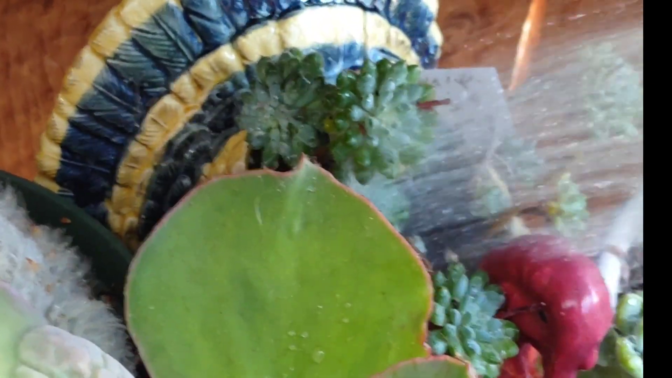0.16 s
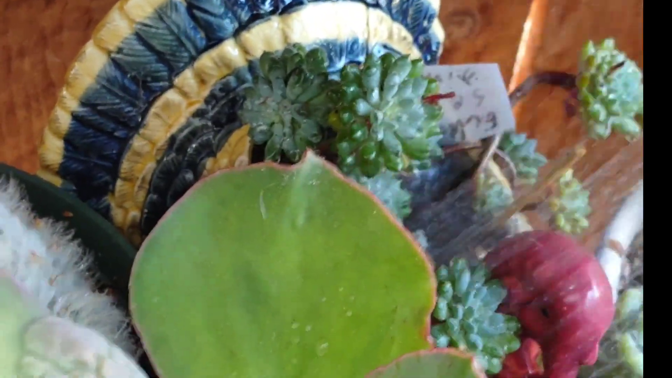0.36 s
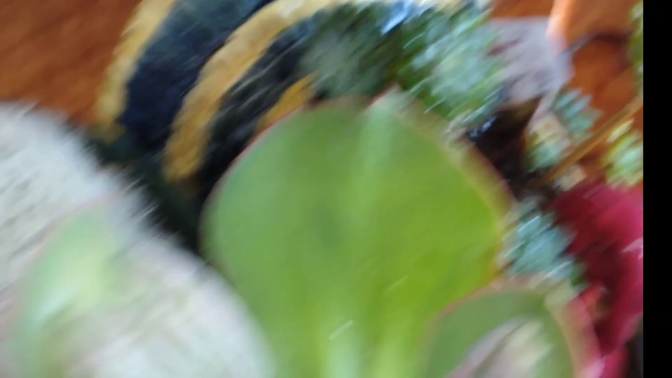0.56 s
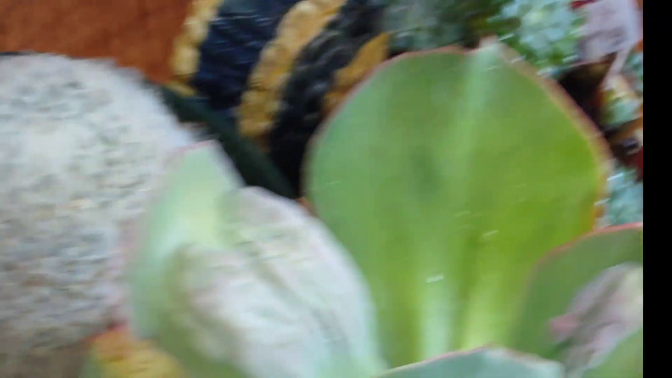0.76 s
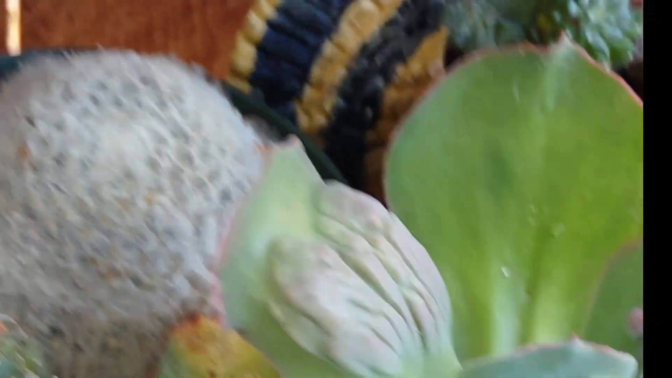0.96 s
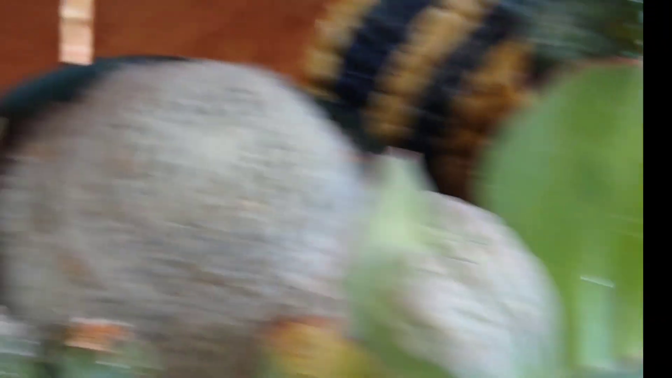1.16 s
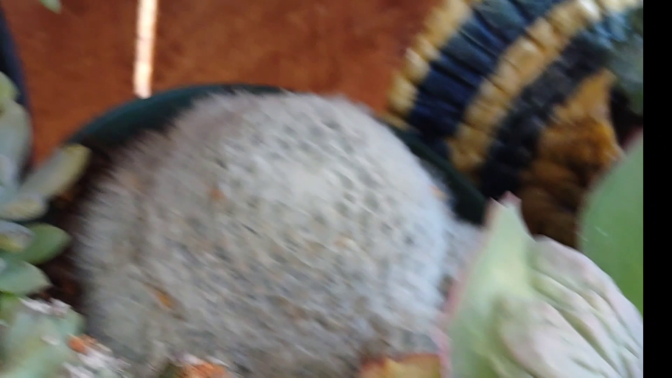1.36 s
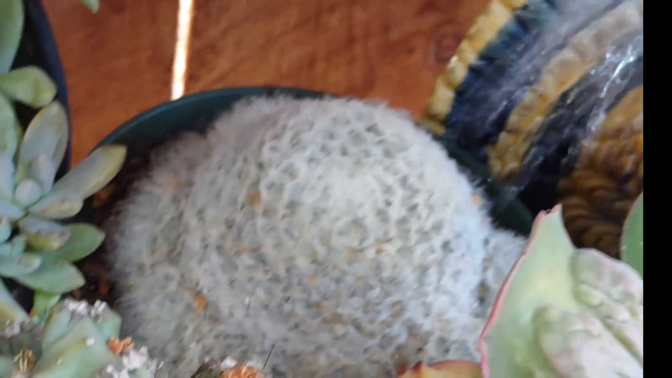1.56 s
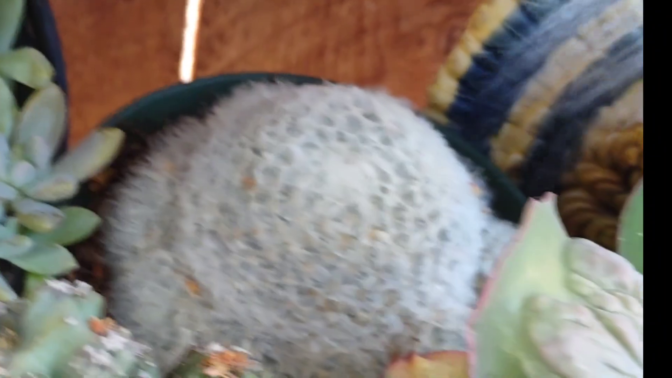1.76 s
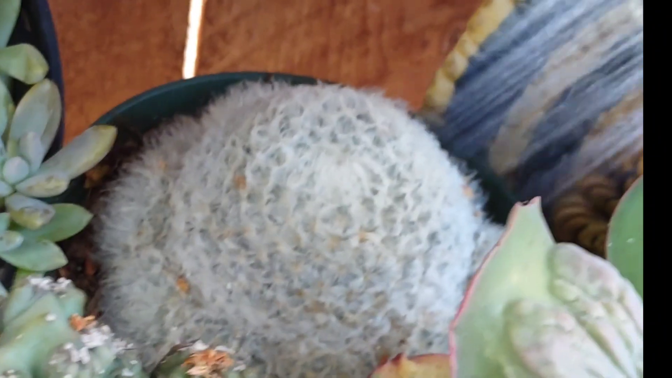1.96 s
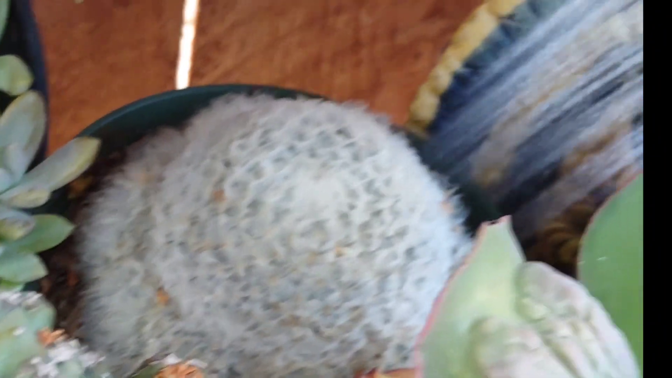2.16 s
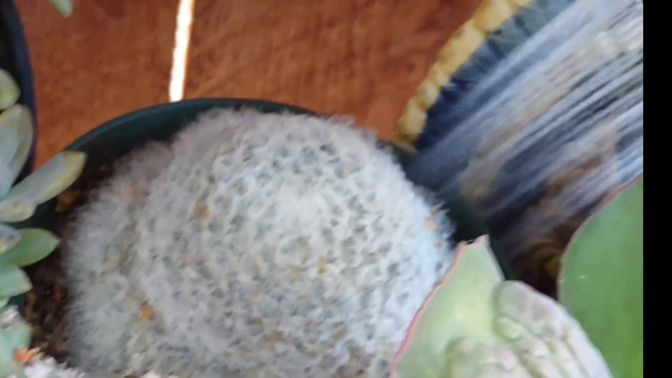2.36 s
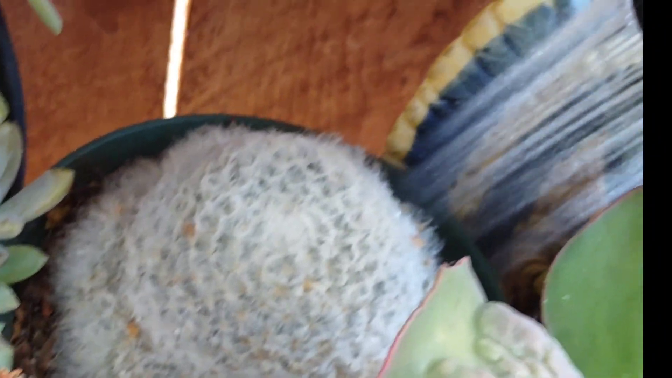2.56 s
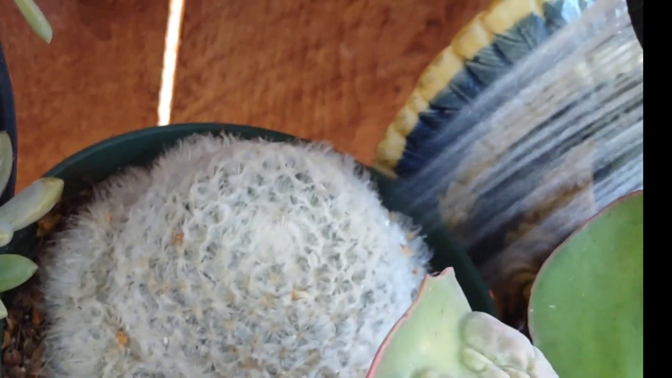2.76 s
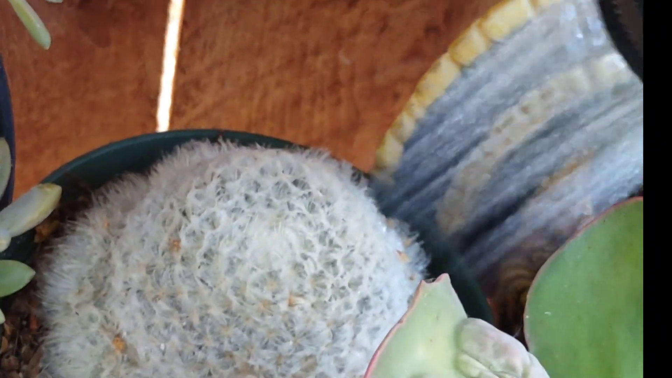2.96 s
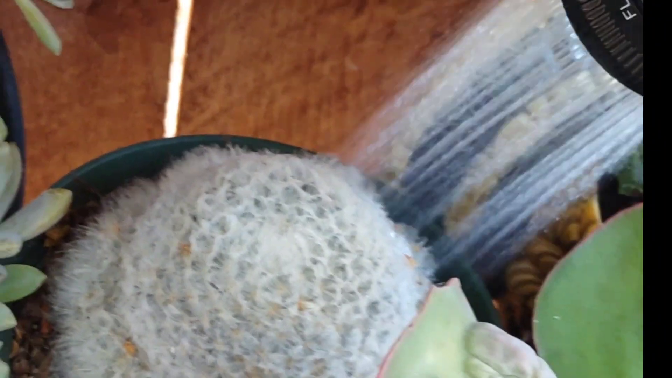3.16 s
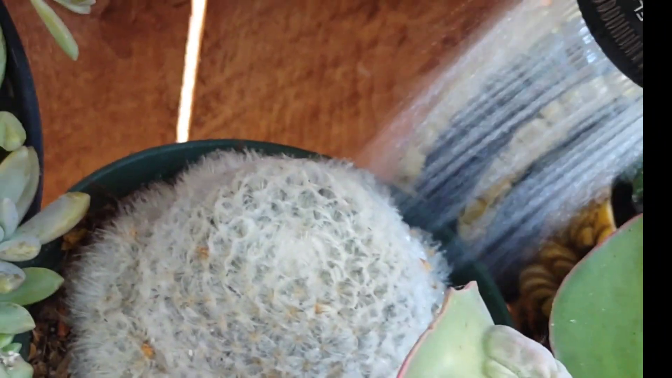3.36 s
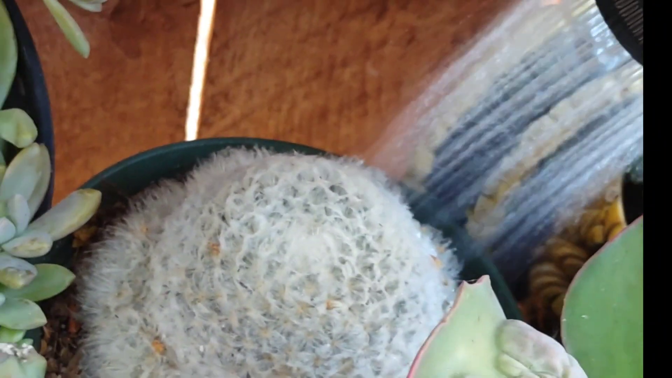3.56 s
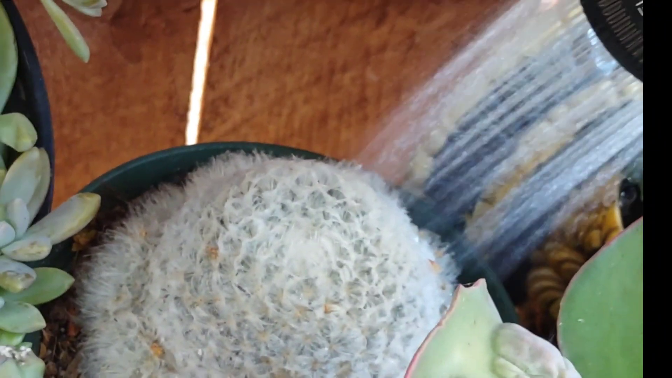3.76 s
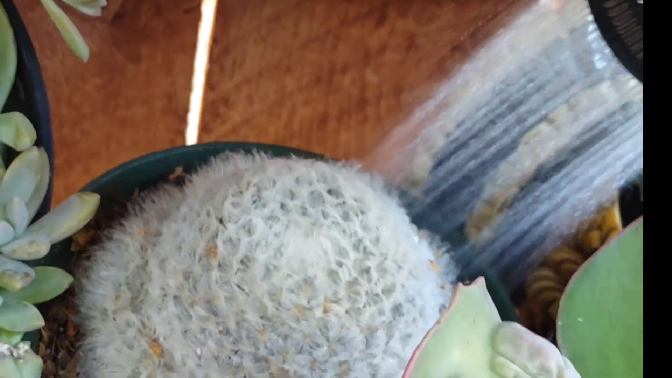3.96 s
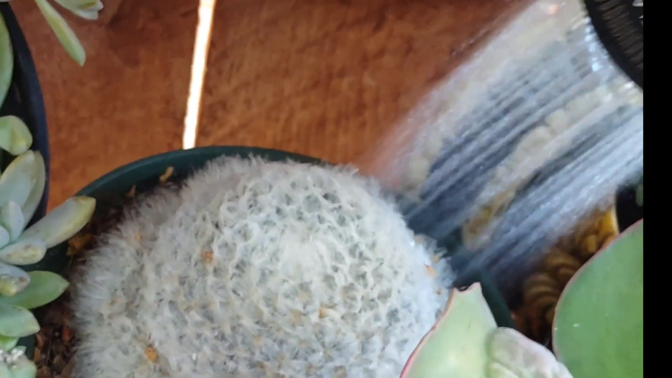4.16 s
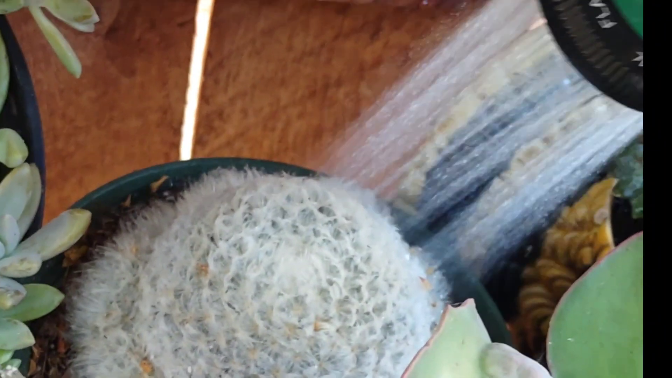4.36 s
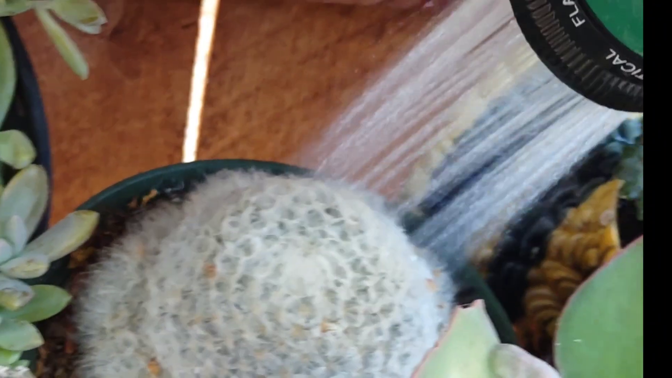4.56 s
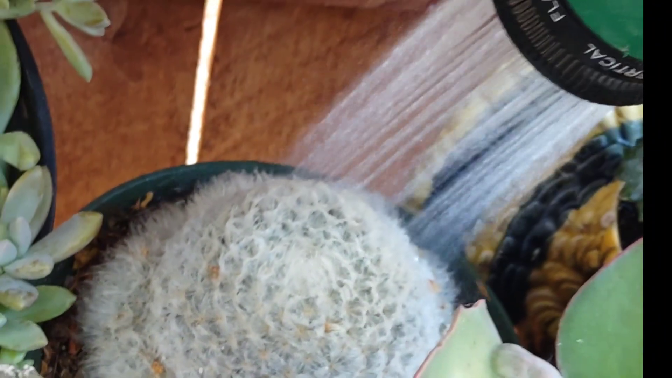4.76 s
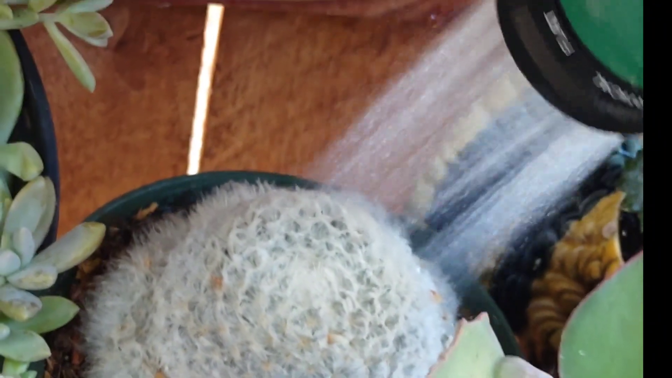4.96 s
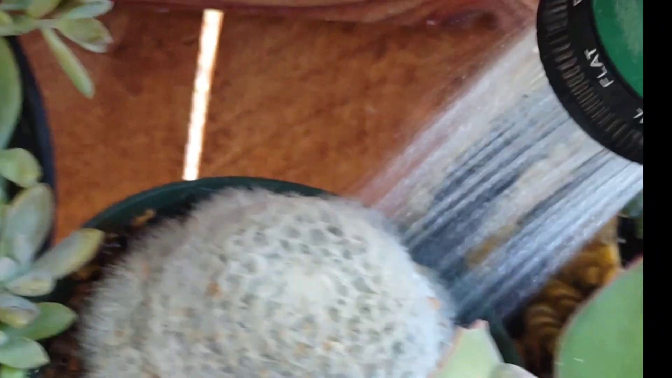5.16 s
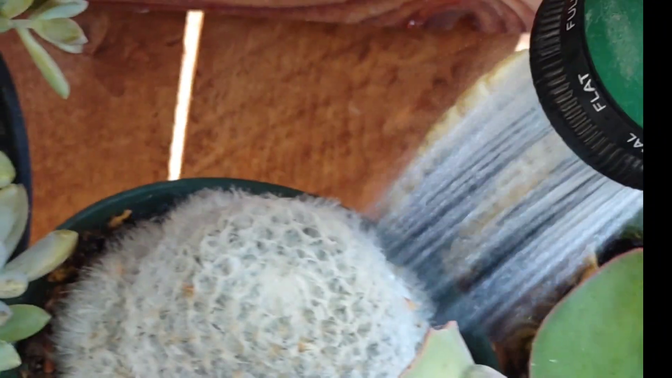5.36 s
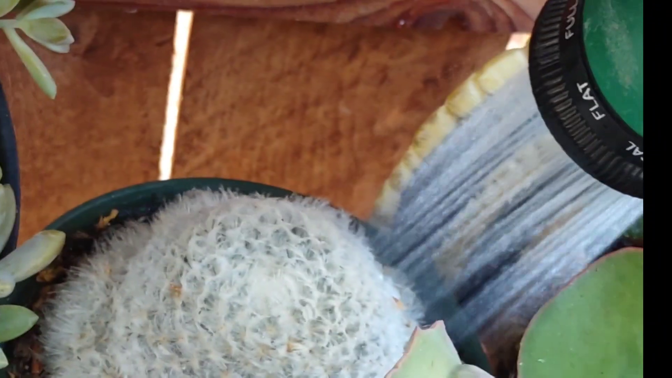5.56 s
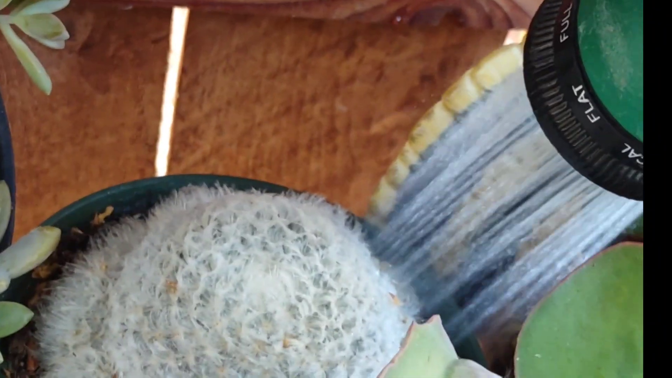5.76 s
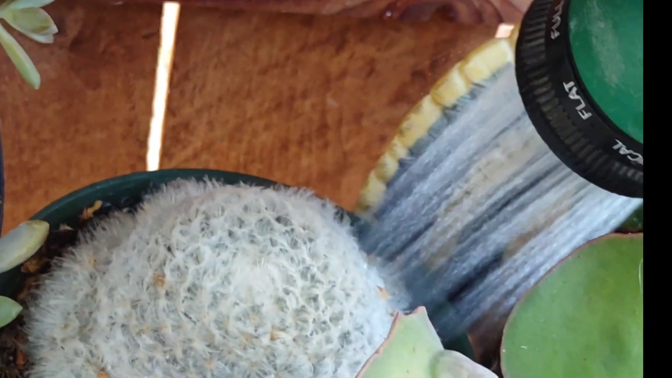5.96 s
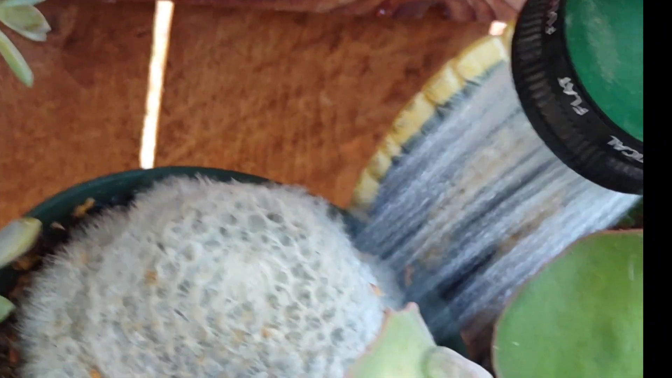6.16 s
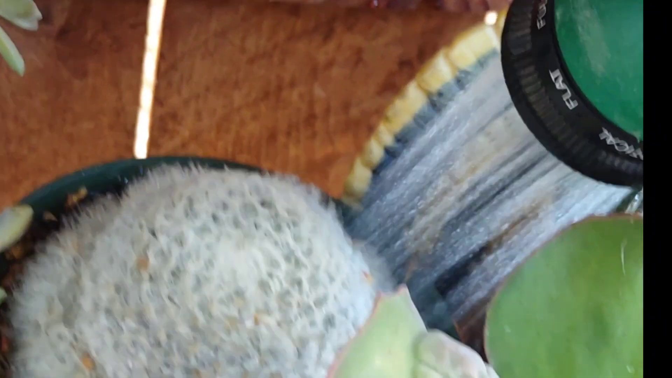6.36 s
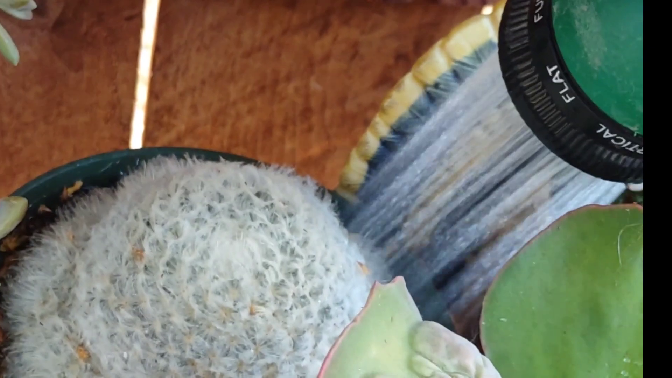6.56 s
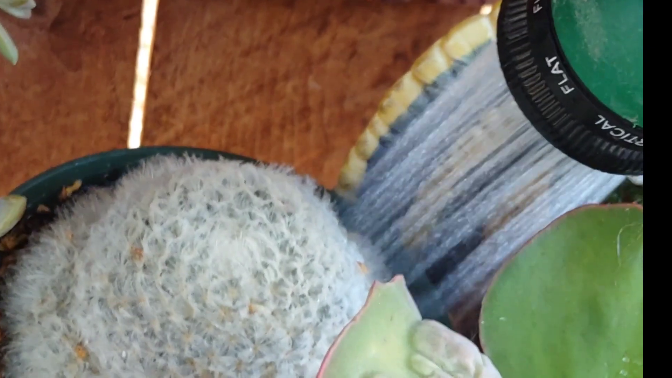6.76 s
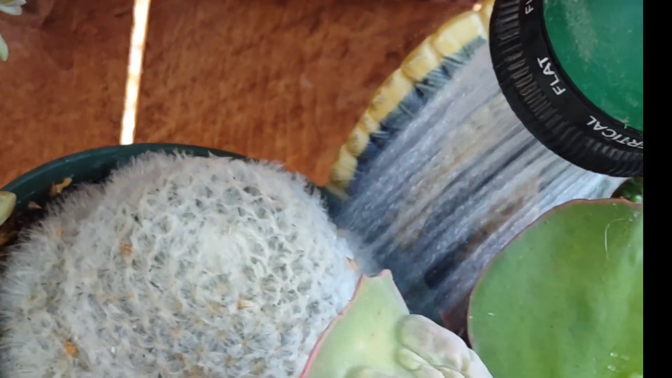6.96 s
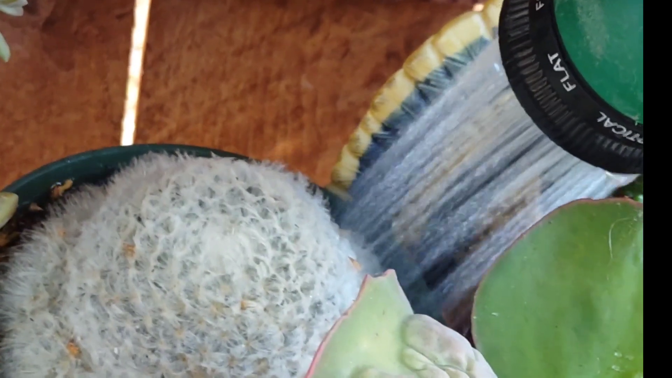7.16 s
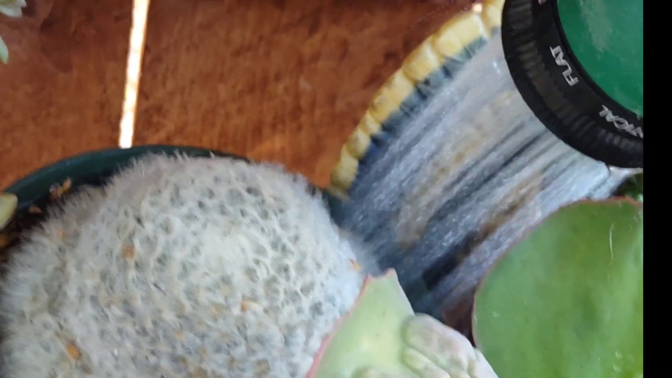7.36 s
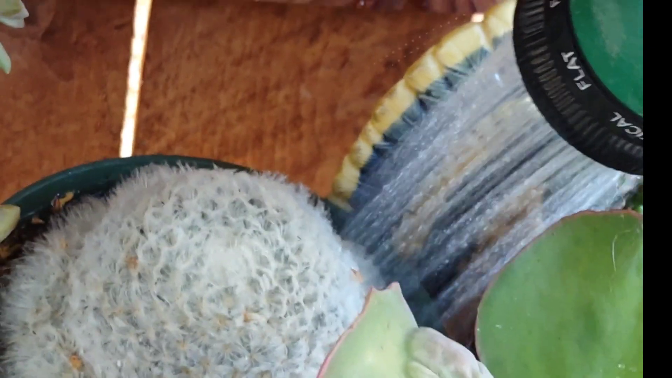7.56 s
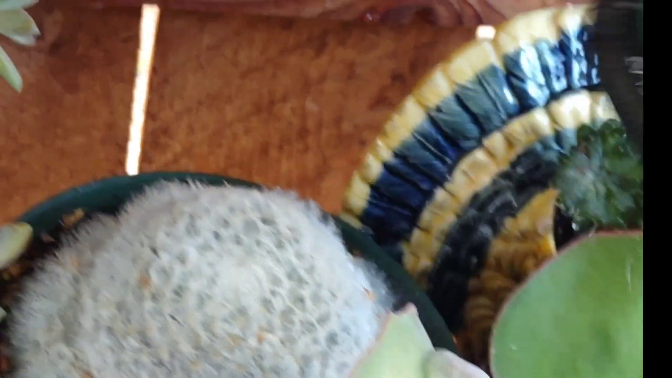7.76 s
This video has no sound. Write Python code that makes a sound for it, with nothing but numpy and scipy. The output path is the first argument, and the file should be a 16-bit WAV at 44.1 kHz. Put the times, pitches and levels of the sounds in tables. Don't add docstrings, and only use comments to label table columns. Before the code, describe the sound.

Close outdoors, a hose spray hisses brightly on a plant pot for a moment, then cuts off. Over a second of scattered drops follows: wet splats, fine ticks, high ringing plinks and small pot knocks. The jet returns, hissing densely for about six seconds with gently sliding colour, then stops into a few drips. Faint low outdoor hum beneath; close, wide stereo phone pickup.

```python
import sys
import numpy as np
from scipy import signal
from scipy.fft import rfft, irfft
from scipy.io import wavfile
from scipy.ndimage import uniform_filter1d

SR = 44100
rng = np.random.default_rng(int(sys.argv[2]) if len(sys.argv) > 2 else 0)


def boost_factor(decibels):
    exponent = np.asarray(decibels, float) / 20
    return 10 ** exponent


def bounce(signal):
    frames = np.transpose(np.atleast_2d(signal))
    limited = np.clip(frames, -1, 1)
    pcm = np.round(limited * 32767).astype(np.int16)
    wavfile.write(sys.argv[1], SR, pcm)


N = 343980
T = np.arange(N) / SR
HZ = np.fft.rfftfreq(2048, 1 / SR)

# (start [s], end [s])
SHUT = [
    (0.3, 1.5),
    (7.68, 7.85),
]


def shape(points, hz):
    f, db = np.transpose(points)
    return np.interp(np.log(hz + 1), np.log(f + 1), db)


def colour(x, db):
    cepstrum = irfft(db * np.log(10) / 20)
    cepstrum[:, 1:1024] *= 2
    cepstrum[:, 1024:] = 0
    return signal.oaconvolve(x, irfft(np.exp(rfft(cepstrum))), axes=1)


def walk(rate):
    hold = int(SR / rate)
    steps = np.repeat(rng.standard_normal(N // hold + 1), hold)
    return uniform_filter1d(uniform_filter1d(steps, hold), hold)[:N]


def curve(tables, column, outside):
    total = outside
    for table in tables:
        times, values = np.array(table).T[[0, column]]
        total = total + np.interp(T, times, values, left=outside, right=outside) - outside
    return total


def patter(rate, spread_db, t60):
    size_db = spread_db * np.minimum(rng.exponential(size=N), 4)
    lands = (rng.random(N) < rate / SR) * boost_factor(2 * size_db)
    decay = 1e-6 ** (1 / (t60 * SR))
    power = signal.lfilter([1], [1, -decay], lands) + 1e-12
    return np.sqrt(power / power.mean())


def leaning(db):
    return boost_factor(np.array([db / 2, -db / 2]))


def hum():
    # (frequency [Hz], level [dB per Hz])
    rumble = [(12, -52), (45, -2.5), (204, -2), (288, -4), (382, -1.5), (517, -6.5), (659, -6),
              (1050, -12.5), (1160, -10.5), (1810, -16), (2500, -8), (3250, -40), (5500, -120)]
    # (frequency [Hz], side minus mid [dB])
    rumble_side = [(30, -27), (60, -19), (125, -14), (250, -13), (500, -4), (1200, -2)]
    rumble_db, tone_hz, tone_db = -63, 209, -76

    hz = np.fft.rfftfreq(N, 1 / SR)
    mid, side = rfft(rng.standard_normal((2, N))) * boost_factor(shape(rumble, hz))
    mid, side = irfft([mid, side * boost_factor(shape(rumble_side, hz))], N)
    swell_db = .7 * walk(3)
    gain = boost_factor(rumble_db + swell_db) / np.std(mid)
    phase = 2 * np.pi * tone_hz * np.cumsum(1 + 0.015 * walk(6.5)) / SR
    tone = boost_factor(tone_db + 3.5 * walk(3.7)) * np.sin(phase)
    return gain * np.array([mid + side, mid - side]) + tone


def knocks():
    # (time [s], peak [dB], low edge [Hz], high edge [Hz], t60 [s])
    raps = [(.69, -50, 980, 1400, 0.067), (.77, -52, 1540, 2000, 0.064), (0.974, -37.5, 2670, 3170, 0.02),
            (1.2955, -20.5, 900, 11000, 0.00092), (1.438, -55, 400, 1500, .008),
            (2.22, -47.5, 603, 1100, 0.24), (3.93, -35.5, 624, 1450, 0.09), (4.011, -36, 250, 3500, 0.0052),
            (4.455, -40, 600, 1400, 0.09), (4.84, -46.5, 150, 700, 0.11), (4.875, -47, 420, 676, 0.13),
            (5.51, -51, 149, 450, 0.034), (6.911, -53, 200, 696, 0.069), (4.457, -24.5, 1100, 2900, 0.029),
            (0.183, -16.5, 7700, 10500, 0.023), (1.418, -44, 1700, 2000, 0.045)]
    dry_below_s, near_pan_db, pot_pan_db = .02, 34.5, 9

    out = np.zeros((2, N))
    t = T[:8192]
    for s, db, low_hz, high_hz, t60 in raps:
        i = int(s * SR)
        is_dry = t60 < dry_below_s
        blow = rng.standard_normal(len(t)) * 1e-3 ** (t / t60)
        if is_dry:
            blow[0] = 4
        band = signal.butter(2 if is_dry else 3, (low_hz, high_hz), "band", fs=SR, output="sos")
        rap = signal.sosfilt(band, blow)
        gains = boost_factor(db) * leaning(near_pan_db if is_dry else pot_pan_db)
        out[:, i:i + len(t)] += np.outer(gains, rap / abs(rap).max())
    return out


def plinks():
    # (time [s], peak [dB], pitch [Hz], left minus
    # right [dB])
    ringing_drops = [(0.36, -29, 4140, -2.5), (0.3743, -26, 5120, -2.5), (0.4261, -26, 5150, -1.5),
                     (0.462, -38, 5090, -3), (0.484, -28, 4200, 5), (0.5179, -28, 5280, 0.5),
                     (0.535, -32, 5420, -1.5), (0.57, -23, 5660, 4), (0.5946, -31, 5690, -0.5),
                     (0.6248, -17, 5970, 8), (0.6656, -21.5, 5040, 0.0), (0.7, -32, 2920, 9),
                     (0.743, -33, 6660, -1.5), (0.7695, -25, 5770, -3), (0.8146, -23, 4140, 6),
                     (0.848, -38, 5450, -0.5), (0.8557, -25, 5170, 0.0), (0.936, -28, 5440, -2.5),
                     (0.9614, -31, 5580, 0.5), (0.975, -37, 3130, 6), (1.0108, -34, 5310, -3.5),
                     (1.0757, -34, 7040, -2.0), (1.086, -19, 7290, 0.5), (1.167, -45, 5420, -7.5),
                     (1.1834, -44, 5430, 2.0), (1.21, -29, 4480, 1), (1.2104, -27, 5450, -1.0),
                     (1.235, -28, 5090, 2), (1.272, -30, 5370, 0.5), (1.292, -30, 7220, 4),
                     (1.3435, -35, 7150, 1.5), (1.355, -31, 7110, -2.0), (1.371, -18, 5400, 1),
                     (1.4079, -39, 4200, 7.0), (1.408, -24, 3270, 8), (1.436, -13, 6450, -1),
                     (1.4698, -27, 3470, 2.5), (1.4837, -24, 3500, 4), (0.462, -29.5, 3000, 7),
                     (0.6045, -23, 5200, 0), (0.625, -27, 3200, -1), (0.677, -27, 4500, 2),
                     (0.986, -28, 5500, 0), (1.099, -34, 3100, 8), (1.112, -28.5, 5500, 0),
                     (1.348, -31, 3090, 5), (1.272, -38, 3220, 2),
                     (7.7313, -34, 5280, -2), (7.7733, -27, 4440, 1.5), (7.7924, -26, 4800, 1.5),
                  (7.7313, -30, 3500, -1), (7.692, -24, 4900, 0)]
    trim_db, t60_s, relative_width = -6.5, 0.062, 0.11

    t = T[:4096]
    out = np.zeros((2, N + 4096))
    for s, db, hz, pan_db in ringing_drops:
        i = int(s * SR)
        blow = rng.standard_normal((2, len(t))) * 1e-3 ** (t / t60_s)
        resonance = signal.iirpeak(hz, 1 / relative_width, fs=SR)
        ring = signal.lfilter(*resonance, blow + blow[0])
        out[:, i:i + len(t)] += boost_factor(db + trim_db) * leaning(pan_db)[:, None] * ring / abs(ring).max()
    return out[:, :N]


def drips():
    # (time [s], peak [dB], body against fizz [dB], left minus right [dB])
    splats = [(0.36, -36, 2.5, 6), (0.374, -13.5, -10.5, 7), (0.4234, -39, -5, -8), (0.463, -18.5, -15, 5),
              (0.538, -11, -23, -1), (0.571, -19, -13, 5), (0.594, -10.5, -16.5, 4), (0.624, -31, 6, 4.5),
              (0.665, -26.5, -4, 2), (7.7924, -41, -1, 6), (0.704, -22, -21, 15), (0.768, -8, -17, -1),
              (0.782, -13.5, -14.5, 5), (0.848, -22, -11.5, 4), (0.961, -21, -17, 6), (0.9844, -34, -9, 3),
              (1.0104, -18, -19, 2), (1.086, -17.5, -20, 1), (1.21, -22, -3, 3.5), (1.2345, -20.5, -7.5, 4),
              (1.271, -32.5, 3, 2), (1.2938, -5.5, -34, -1), (1.3555, -21, -15, 10), (1.369, -18, -11, 0),
              (1.407, -17.5, -9.5, 8), (1.422, -27, -2, -1), (1.4352, -24.5, 0.5, -2), (1.481, -26, 0, 2),
              (7.731, -38.5, 7, 3), (7.7724, -22, -9.5, 4)]
    # (time [s], peak [dB])
    ticks = [(0.4835, -13), (0.4885, -18), (0.541, -20), (0.7678, -10), (0.772, -16), (1.2936, -3.5),
             (0.913, -22), (0.5172, -24), (0.6754, -21), (0.745, -14.5), (0.805, -11), (0.8154, -15),
             (0.834, -12), (0.8774, -20), (0.8869, -15), (0.908, -15), (0.924, -12), (1.0204, -15),
             (1.0394, -37), (1.076, -6), (1.1124, -42), (1.147, -20), (1.1679, -13), (1.1844, -33),
             (1.3219, -15), (1.3397, -17), (1.4616, -27), (7.7057, -12), (0.604, -22), (0.718, -24),
             (0.9619, -13), (1.138, -30), (1.2587, -28), (2.894, -4), (4.0104, -14), (4.4374, -8),
             (4.4813, -5), (5.027, -3), (5.07, 0), (1.704, -14), (7.7437, -34), (7.7534, -38), (7.7684, -8),
             (7.68, -33), (7.692, -30)]
    dribble_db, drain_db_per_s = (-41, -52.5, -52.5), (-5.5, -2, -11)
    fade_s, trickle = 0.027, 0.088
    splat_db, per_body = np.array((-13, -1, -4)), np.array((0, 1, 1.9))
    splat_t60_s, tick_t60_s, front_s = 0.02, 0.011, 0.0011
    spatter_db, spatter_t60_s = -10.5, 0.087
    tick_body_db, tick_pan_db = -50, 3.5

    thin = patter(110, 2.2, .035)
    power = np.zeros((4, 2, N))
    for k, (db, drain_db) in enumerate(zip(dribble_db, drain_db_per_s)):
        own = patter(300 / (k + 1), 2.1, .02)
        pulses = trickle / (k + 1) + np.sqrt(thin) * own ** 1.3
        for a, b in SHUT:
            shut = np.clip(np.minimum(T - a, b - T) / fade_s, 0, 1)
            power[k] += (shut * boost_factor(db + drain_db * (T - a))) ** 2 * pulses

    drops = [(*row, splat_t60_s) for row in splats]
    drops += [(s, db, tick_body_db, tick_pan_db, tick_t60_s) for s, db in ticks]
    for s, db, body_db, pan_db, t60 in drops:
        i = int(s * SR)
        t = T[:min(8192, N - i)]
        fall = 1e-6 ** (t / t60) + boost_factor(2 * spatter_db) * 1e-6 ** (t / spatter_t60_s)
        fall *= 1 - np.exp(-t / front_s)
        heard = boost_factor(db + splat_db + body_db * per_body)[:, None] * leaning(pan_db - 4)
        power[:3, :, i:i + len(fall)] += heard[:, :, None] ** 2 * fall
    return np.sqrt(power)


def spray():
    # (time [s], flow [dB], aim at leaves [dB], left minus right [dB])
    squeezes = [
        [(0.0, -0.5, -1, 4), (0.28, -1, -6, 3), (0.33, -10, -4, 4), (0.41, -46, -13, -4)],
        [(1.37, -41, -4, -1), (1.48, -10, -3.5, -1.5), (1.57, -1.5, 1.5, -1.5), (1.78, -0.5, 1, 0.5),
         (2.36, 3.5, 0.5, 1.5), (2.6, 2, 2, 0), (2.95, -0.5, 0.5, 0), (3.6, 1, -2, 0), (4.45, 1.5, -2.5, -0.5),
         (4.7, -1.5, -1, 0.5), (5.07, -1, -2.5, 0.5), (5.25, -2, 0, 1.5), (6.0, 0, -1.5, 2), (7.5, -2.5, -1, 2),
         (7.62, 0, -12, 1.5), (7.67, -5, -11, -0.5), (7.71, -26, -14, 0)],
    ]
    layer_db = -25.5, -27.5, -32, -45.5
    per_flow, per_aim = (0.78, 0.9, 0.75, 1.87), (0.13, 0.65, 0.022, 0.52)

    surge_db = .5 * walk(25)
    flow_db, aim_db, pan_db = curve(squeezes, 1, -200), curve(squeezes, 2, 0), curve(squeezes, 3, 0)
    layers = []
    for db, by_flow, by_aim in zip(layer_db, per_flow, per_aim):
        level_db = db + by_flow * flow_db + by_aim * aim_db
        drops = patter(4000, 2.6, .012)
        flicker_db = .8 * walk(20)
        layers.append(boost_factor(level_db) * drops * boost_factor(surge_db + flicker_db) * leaning(pan_db))
    return np.array(layers)


def echoes(places):
    lags = rng.uniform(.0015, .009, (places, 2, 1, 6))
    reflected = .07 * np.exp(-2j * np.pi * HZ[:, None] * lags).sum(axis=3)
    return 20 * np.log10(abs(1 + reflected) + .1)


def water(envelopes):
    # (frequency [Hz], level [dB])
    left_port = [(120, -60), (300, -49), (600, -47), (900, -34), (1100, -22), (1600, -24), (1900, -14),
                 (2800, -16), (3300, -10), (6500, -9), (8800, -22), (9600, -12), (10300, 0), (11800, -7),
                 (12900, -21), (13600, -24), (15100, -24), (15200, -32)]
    # (frequency [Hz], level [dB])
    right_port = [(120, -60), (300, -50), (600, -49), (900, -38), (1150, -27), (1600, -30), (2300, -16),
                  (3400, -19), (5000, -10), (7600, -14), (8800, -7), (9500, -19), (10200, -36),
                  (11300, -23), (12300, -28), (12500, -36)]
    # (centre [Hz], width [Hz], left [dB], right [dB])
    back_pot = [(1590, 330, 13, 16), (2780, 1170, 16, 20.5), (3850, 510, 13.5, 25), (4320, 310, 3, -23),
                (5500, 600, 5, 13.5), (7040, 1700, 4, 6), (10250, 230, 2, 3), (11000, 410, -2, 8),
                (11900, 960, -6, 0), (14700, 1500, -5, -6)]
    first_drips = [(2000, 750, -16, -22), (2900, 920, 14, 10), (4200, 250, 6, -8), (5530, 420, -9, 11.5),
                   (8500, 1200, -13, 3.5)]
    jet_returns = [(1000, 640, -11, -14), (2400, 320, 9.5, 8), (2820, 300, 5, 6), (3490, 380, 11.5, 12),
                   (4570, 250, -9, -6), (5620, 310, 8, 10), (6400, 290, 5, -4), (8200, 600, 4, 3),
                   (10500, 700, 1.5, 6)]
    pot_rim = [(940, 450, -6.5, -9), (1700, 93, -8, -3), (2350, 580, 11.5, 9), (3000, 1340, 6.5, 12.5),
               (3380, 280, 13, 6), (3930, 920, 3, 6), (5000, 240, 0, 12), (5000, 390, 4, 5),
               (5780, 160, 6, 13), (6230, 170, 2, -26), (8800, 670, 3, 1.5), (10900, 780, -2.5, 6)]
    cactus_far = [(960, 260, -7, -4), (1136, 57, 7, -2), (1560, 180, -1.5, -6), (1782, 94, 6, 6),
                  (2510, 180, -2.5, -6.5), (3300, 210, 2, 5), (3670, 47, 5, 0), (4130, 170, 6.5, -2.5),
                  (4580, 690, -7.5, 2), (5400, 150, 4.5, 6.5), (6500, 300, 0, -8), (7170, 400, 4.5, 1.5),
                  (7900, 510, -8, 1), (11000, 1100, -0.5, 0)]
    cactus_near = [(980, 97, -9, -3), (1110, 68, 2.5, -3), (1574, 82, -3.5, -3), (2380, 240, -0.5, 4),
                   (2647, 83, -4.5, 0), (3000, 600, 2, 0), (4140, 100, -1, -2), (3630, 220, 4.5, 8),
                   (4500, 150, 3, 7), (5100, 180, -6.5, 6), (5660, 210, 5, -2), (6470, 440, -7, 4.5),
                   (8000, 770, 3, -3), (9400, 370, 1.5, -4), (10300, 540, -0.5, 9),
                   (11150, 1200, -4.5, 1.5)]
    last_drips = [(1900, 930, -11, -19), (4570, 800, 1, 5)]
    # (start [s], crossfade [s], hollows)
    places = [(0, .1, back_pot), (.36, .08, first_drips), (1.46, .12, jet_returns), (1.8, .25, pot_rim),
              (2.85, .7, cactus_far), (5.2, 1.2, cactus_near), (7.7, .08, last_drips)]
    layer_edges_hz = 7500, 4500, 1700
    shared, right_lag = (.25, .5, .6, .8), (1, 3, 4, 3)

    lowpass = [1] + [1 / (1 + (HZ / edge) ** 12) for edge in layer_edges_hz] + [0]
    ports_db = np.array([shape(left_port, HZ), shape(right_port, HZ)])
    arrived = [np.clip((T - s) / move + .5, 0, 1) if s > 0 else 1 for s, move, _ in places]
    arrived.append(0)
    ripple_db = echoes(len(places))
    out = np.zeros((2, N + len(HZ) * 2))
    for j, (envelope, share) in enumerate(zip(envelopes, shared)):
        both, left, right = rng.standard_normal((3, N))
        common = np.array([both, np.roll(both, right_lag[j])])
        noise = np.sqrt(share) * common + np.sqrt(1 - share) * np.array([left, right])
        band_db = 10 * np.log10(lowpass[j] - lowpass[j + 1] + 1e-6)
        for k, (_, _, hollows) in enumerate(places):
            db = ripple_db[k] + ports_db + band_db
            for hz, width, *boost_db in hollows:
                db += np.outer(boost_db, 1 / (1 + (2 * (HZ - hz) / width) ** 2))
            db -= 10 * np.log10(np.mean(boost_factor(db) ** 2) / 2)
            here = np.maximum(arrived[k] - arrived[k + 1], 0) ** .7
            a, b = np.flatnonzero(here)[[0, -1]]
            heard = colour((noise * envelope * here)[:, a:b], db)
            out[:, a:a + heard.shape[1]] += heard
    return out[:, :N]


def sway(wet):
    # (time [s], high hollow [Hz], high hollow [dB], middle hollow [Hz])
    aim = [(1.5, 10500, -1, 5620), (1.95, 10500, 3.5, 5550), (2.45, 10330, 5, 5700), (2.75, 9600, -1, 5800),
           (3.1, 10200, 5.5, 5740), (3.5, 10500, -3, 5660), (3.9, 10600, -4, 5360), (4.2, 11100, 5, 5500),
           (4.4, 10300, 7, 5440), (5.1, 10500, 2.5, 5430), (5.3, 10250, -8, 5000), (6.0, 10300, 7.5, 5100),
           (6.6, 10300, 4, 5150), (7.2, 10250, 5, 5240), (7.7, 10300, -1, 5370)]
    # (time [s], lowest splash [Hz])
    low_edge = [(0.24, 900), (0.3, 1220), (0.34, 1900), (0.4, 2100), (1.44, 2130), (1.5, 1900),
                (1.56, 1390), (1.63, 940), (1.8, 570), (7.5, 600), (7.6, 1100), (7.68, 1700), (7.74, 2200)]
    high_width_hz, middle_width_hz, middle_db = 143, 550, 3
    under_edge_db = -2.5
    shimmer_db, patch_bins, patch_frames = 1.1, 5, 25

    hz, t, z = signal.stft(wet, SR, nperseg=1024)
    hz = hz[:, None]
    s, high_hz, high_db, middle_hz = np.transpose(aim)

    def bump(centre, width):
        return 1 / (1 + (2 * (hz - np.interp(t, s, centre)) / width) ** 2)

    db = np.interp(t, s, high_db) * bump(high_hz, high_width_hz)
    db += middle_db * bump(middle_hz, middle_width_hz)
    db *= t > SHUT[0][1]
    db += under_edge_db / (1 + (hz / np.interp(t, *np.transpose(low_edge))) ** 10)
    patches = rng.standard_normal(db.shape)
    for axis, size in ((0, patch_bins), (0, patch_bins), (1, patch_frames), (1, patch_frames)):
        patches = uniform_filter1d(patches, size, axis=axis)
    db += shimmer_db * patches / patches.std()
    return signal.istft(z * boost_factor(db), SR, nperseg=1024)[1][:, :N]


def scene():
    splash = sway(water(np.hypot(spray(), drips())))
    return splash + knocks() + hum() + plinks()


def roll_off(x):
    return signal.sosfilt(signal.butter(12, 16510, fs=SR, output="sos"), x)


def record(dry):
    peak, top_hz = .7, 15520
    masked_hz, mask_db = 9500, -29
    valley_db, valley_low_hz, valley_high_hz = -4.7, 500, 15100

    rounded = dry / (1 + (dry / peak) ** 10) ** .1
    hz, _, z = signal.stft(rounded, SR, nperseg=2048)
    hz = hz[:1024, None]
    bins = z[:, :1024]

    power = (abs(bins) ** 2).reshape(2, 64, 16, -1).mean(axis=2)
    power = uniform_filter1d(power, 3)
    kept = np.repeat(power > boost_factor(2 * mask_db) * power.max(axis=(0, 1)), 16, axis=1)
    bins *= (kept | (hz < masked_hz)) & (hz < top_hz)

    fine = (abs(bins) ** 2).reshape(2, 256, 4, -1).sum(axis=(0, 2))
    fine = uniform_filter1d(fine, 2)
    hills = np.exp(uniform_filter1d(np.log(fine + 1e-20), 9, axis=0))
    valley = np.repeat(fine < boost_factor(valley_db) ** 2 * hills, 4, axis=0)
    bins *= ~(valley & (hz > valley_low_hz) & (hz < valley_high_hz))
    mix = signal.istft(z, SR, nperseg=2048)[1][:, :N]
    return roll_off(mix)


dry = scene()
out = record(dry)
bounce(out)
```